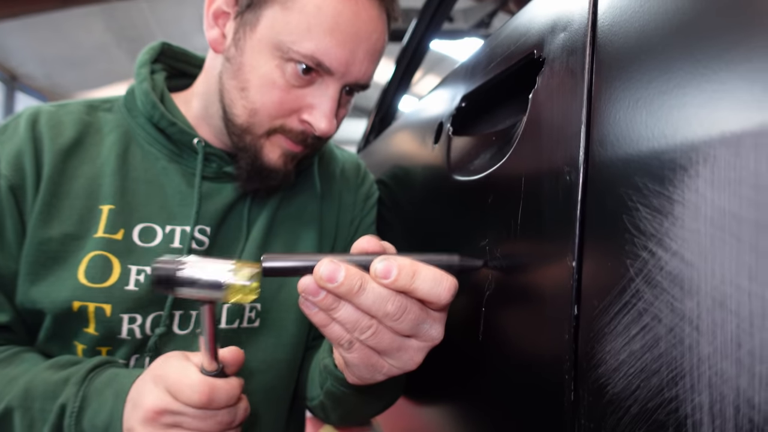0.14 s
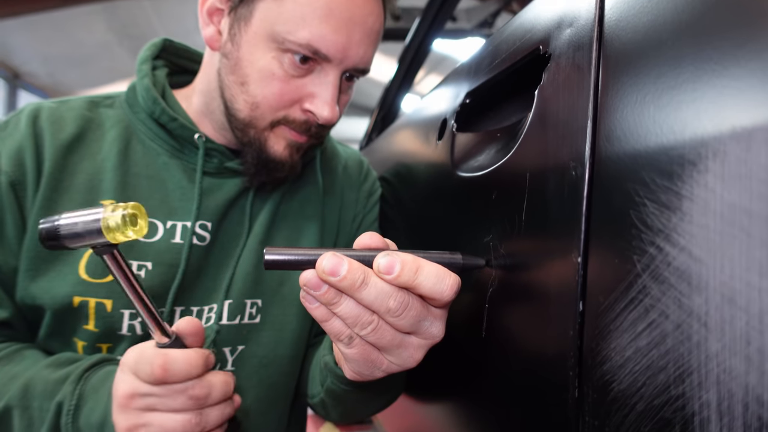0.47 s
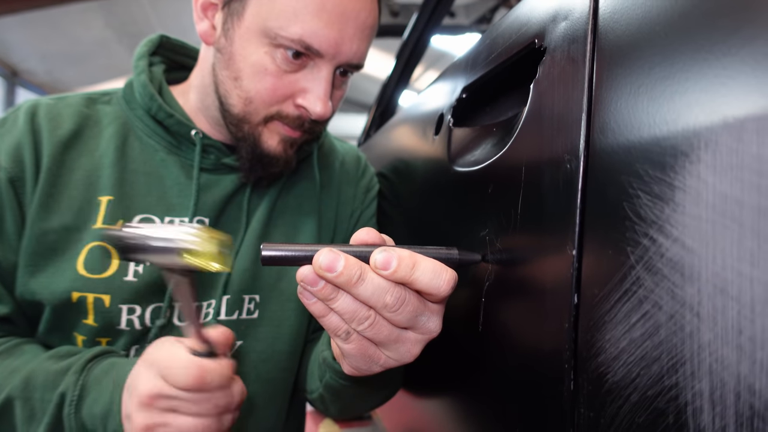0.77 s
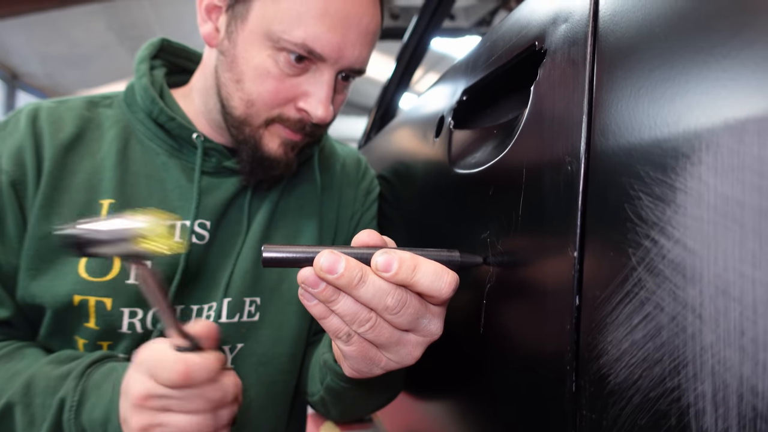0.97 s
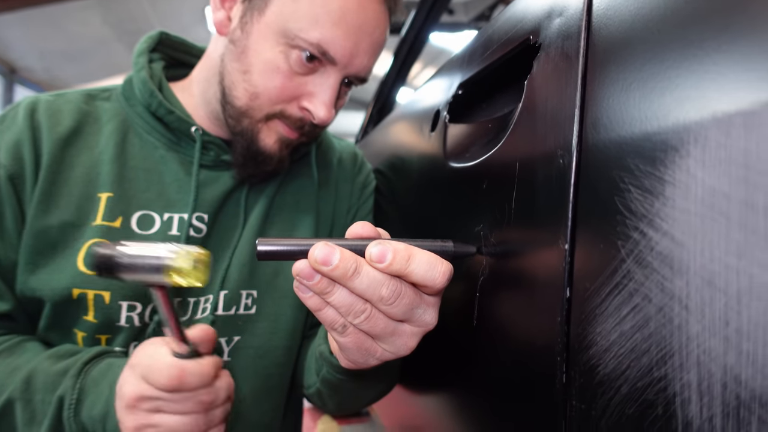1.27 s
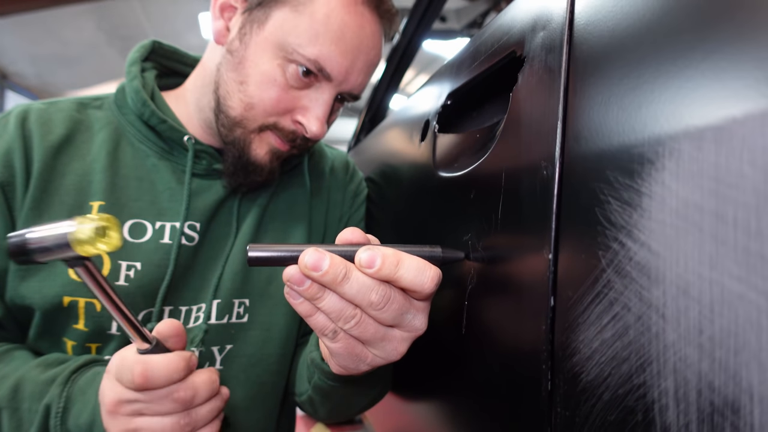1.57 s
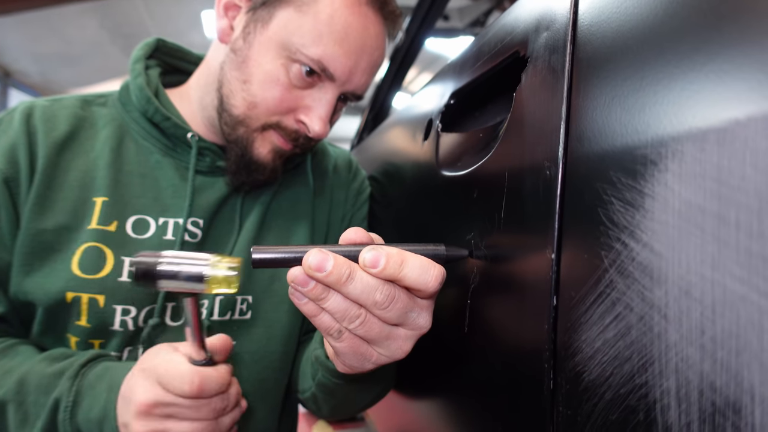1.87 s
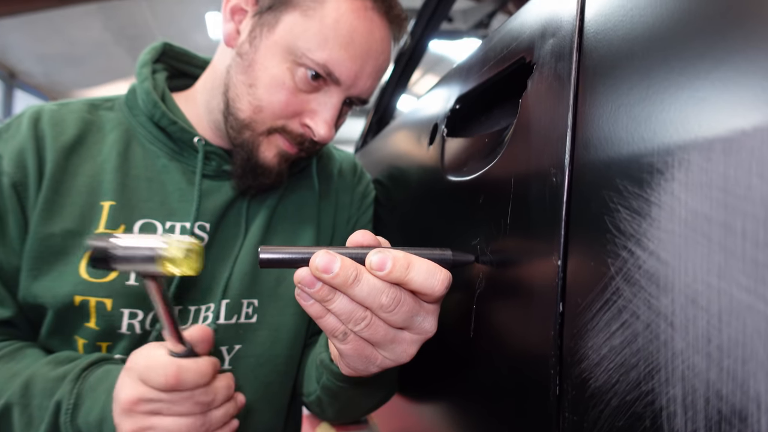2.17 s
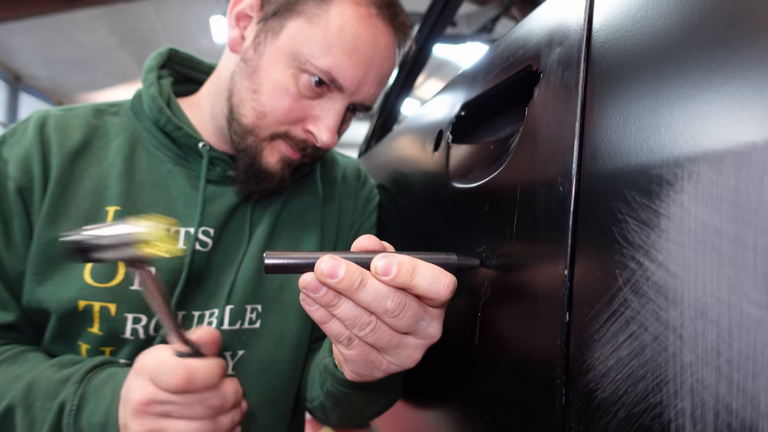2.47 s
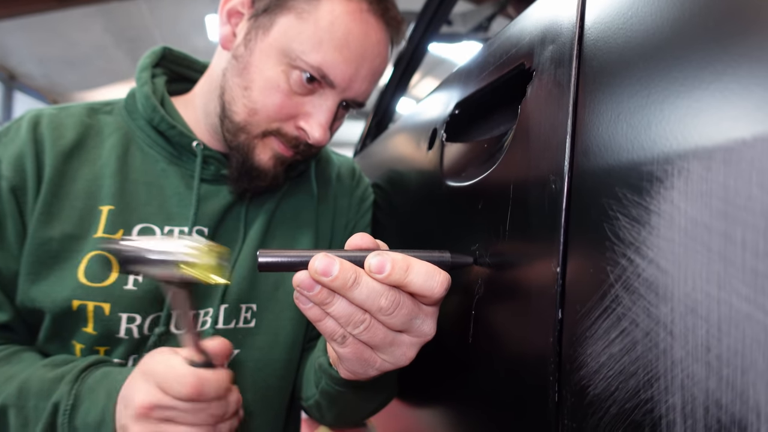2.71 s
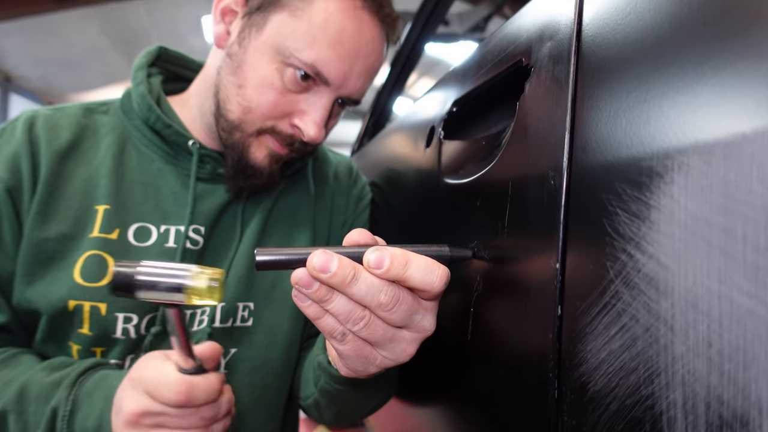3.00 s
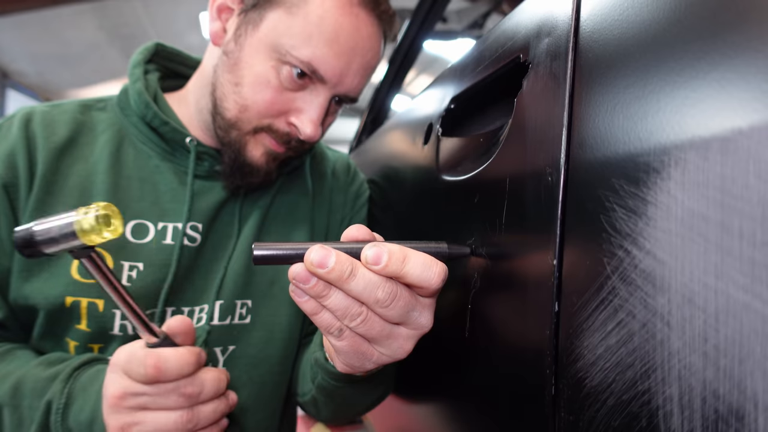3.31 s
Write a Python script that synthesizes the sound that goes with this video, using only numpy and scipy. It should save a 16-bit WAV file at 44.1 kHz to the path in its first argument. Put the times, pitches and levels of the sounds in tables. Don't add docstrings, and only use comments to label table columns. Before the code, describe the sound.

A small hammer taps a plastic punch against a car door, one tap already ringing at 0 s, then evenly about every 0.22 s from 0.18 to 3.45 s, sixteen more taps. Each is a hard, clipped snap with a hollow midrange metal ring, soft low boom and tiny rebound rattle. Tails overlap in short workshop reverberation over very faint air hiss. Close mono microphone; tone shifts slightly between blows.

```python
import sys
import numpy as np
from scipy import signal
from scipy.fft import rfft
from scipy.io import wavfile

SR = 44100
rng = np.random.default_rng(int(sys.argv[2]) if len(sys.argv) > 2 else 0)


def to_wav(sig):
    pcm = np.clip(np.atleast_2d(sig), -1, 1) * 32767
    pcm = np.round(pcm).astype(np.int16)
    wavfile.write(sys.argv[1], SR, pcm.T)


def makeup_ratio(level_db):
    decades = np.asarray(level_db, float) / 20
    return 10 ** decades


N = 152145
PAD = 4410
SPAN = 30000
DIP_S = .00016


def read(points, hz):
    f, value = np.transpose(points)
    return np.interp(np.log(hz + 1), np.log(f + 1), value)


def add(mix, start_s, sound):
    part = mix[PAD + round(start_s * SR):][:len(sound)]
    part += sound[:len(part)]


def rise(delay_s, rise_s):
    t = np.arange(SPAN) / SR
    return 1 - np.exp(-np.maximum(t - delay_s, 0) / rise_s)


def ring(modes, offsets_db=0, flip=1):
    hz, db, t60 = np.transpose(modes)[:, :, None]
    t = np.arange(SPAN) / SR
    sign = flip ** np.arange(len(modes))[:, None]
    envelope = makeup_ratio(db + offsets_db - 60 * t / t60)
    return -(sign * envelope * np.sin(2 * np.pi * hz * t)).sum(0)


def hiss(colour, t60s, size=SPAN):
    hop, window = 128, 512
    frames = size // hop + 5
    hz = np.fft.rfftfreq(window, 1 / SR)
    z = rng.standard_normal((frames, len(hz), 2)) @ [1, 1j]
    gain = makeup_ratio(read(colour, hz))
    t = np.arange(frames)[:, None] * hop / SR
    z = z * gain / np.linalg.norm(gain) * makeup_ratio(-60 * t / read(t60s, hz))
    return signal.istft(z.T, nperseg=window, noverlap=window - hop)[1][:size]


def chatter(colour, t60_s):
    size = 1024
    z = rfft(rng.standard_normal(size))
    burst = np.fft.irfft(z * makeup_ratio(read(colour, np.fft.rfftfreq(size, 1 / SR))))
    return burst * makeup_ratio(-60 * np.arange(size) / SR / t60_s)


def hump(start_s, length_s):
    u = (np.arange(SPAN) / SR - start_s) / length_s
    return np.sin(np.pi * np.clip(u, 0, 1))


def still_air():
    # frequency in Hz, shop air in dB per Hz.
    air_colour = [(20, -29), (200, -17), (470, -48), (1840, 1), (4500, -17), (8000, -35), (15500, -41),
                  (16800, -75)]
    # frequency in Hz, microphone self-noise in dB per Hz.
    self_colour = [(3000, -6), (9000, 0), (15500, -2), (16300, -30)]
    steady = [(20, 1e6), (20000, 1e6)]
    return makeup_ratio(-56) * hiss(air_colour, steady, N) + makeup_ratio(-70) * hiss(self_colour, steady, N)


def diffuse_answer():
    # frequency in Hz, dense door ring in dB per Hz.
    dense_colour = [(40, -33), (240, -11.5), (430, 1.5), (990, -11.5), (1760, -6.5), (3060, -21.5),
                    (6500, -41), (16000, -75)]
    # frequency in Hz, t60 of the dense ring in s.
    dense_t60 = [(60, 1), (260, 0.27), (700, 0.4), (1840, 0.17), (4850, 0.12), (12000, .08)]
    # frequency in Hz, workshop answer in dB per Hz.
    shop_colour = [(200, -22.5), (340, 1.5), (900, -12.5), (1850, -4.5), (5000, -29), (6000, -29),
                   (7000, -38.5), (16000, -55)]
    # frequency in Hz, t60 of the workshop in s.
    shop_t60 = [(60, 0.79), (260, 0.33), (700, 0.96), (1840, .55), (6000, 0.53), (9000, 0.56),
                (14000, 0.23)]
    dense = makeup_ratio(-12.5) * rise(0, 0.0072) * hiss(dense_colour, dense_t60)
    shop = makeup_ratio(-23) * rise(0.014, 0.0071) * hiss(shop_colour, shop_t60)
    return dense + shop


def cavity_boom():
    # frequency in Hz, level in dB, t60 in s.
    boom_modes = [(67, -30.5, .45), (114.2, -31.5, 0.29), (127, -44, 0.9), (155.9, -31, 0.41),
                  (177.2, -53.5, 0.16), (268.7, -28, 0.3)]
    rise_turns = 3.6
    return sum(rise(0, rise_turns / mode[0]) ** 2 * ring([mode]) for mode in boom_modes)


def bounce_rattle():
    # frequency in Hz, rattle in dB per Hz.
    rattle_colour = [(2500, -20), (5500, 5), (10000, -7.5), (15000, -23)]
    return chatter(rattle_colour, 0.017)


def plastic_crack(tick_db):
    # frequency in Hz, crack in dB per Hz.
    crack_colour = [(2000, -32), (4000, 26), (6500, -2), (10000, -2), (15500, 2)]
    return makeup_ratio(-15 + tick_db) * chatter(crack_colour, .007)


def panel_ring(creep, lean):
    # frequency in Hz, level in dB, t60 in s.
    shell_modes = [(343.8, -11, 0.42), (429, -8, 0.29), (466.2, -3.5, .3), (481.5, 1.5, 0.1),
                   (535, -17.5, 0.48), (563.6, -14.5, 0.47), (598, -19.5, 0.43), (629.7, -28, 0.56),
                   (677, -24, 0.44), (739.7, -16.5, 0.44)]
    # frequency in Hz, level in dB, t60 in s.
    skin_modes = [(915, -11, 0.16), (986, -13.5, 0.34), (1002, -24, 0.17), (1227, -24, 0.21),
                  (1417, -18.5, 0.45), (1478, -18.5, 0.13), (1615, -13, 0.14), (1700.5, -16.5, 0.13),
                  (1766, -16, 0.52), (1828, -10.5, 0.24), (2086, -20, 0.47), (2256, -31, 0.35),
                  (2508, -30.5, 0.62)]
    # frequency in Hz, level in dB, t60 in s.
    flex_modes = [(505, -2, .04), (920, -11, .015), (1350, -9, .008), (1900, -12, .012)]
    # frequency in Hz, level in dB, t60 in s.
    frame_modes = [(388, -9, .17), (414, -13, .17)]
    drift_db, scatter_db, frame_swap_db = 1, 1.59, 8
    offsets_db = drift_db * lean * (creep - .5) + scatter_db * rng.standard_normal(lean.shape)
    shell_db, skin_db = np.split(offsets_db, [len(shell_modes)])
    frame_db = frame_swap_db * creep * np.array([[-1], [.5]])
    rung = rise(0, 0.00077) * (ring(flex_modes) + ring(shell_modes, shell_db - 13, flip=-1))
    rung = rung + rise(0, 0.0029) * ring(skin_modes, skin_db - 14, flip=-1)
    rung = rung + rise(0, .018) ** 2 * ring(frame_modes, frame_db)
    return signal.lfilter(*signal.butter(2, 250, "high", fs=SR), rung)


def push(tick_db):
    snap_s, in_s, out_s = .00008, .00039, .00068
    snap_start, in_start, out_start = np.cumsum([DIP_S, snap_s, in_s])
    contact = -makeup_ratio(-10) * hump(0, DIP_S) + makeup_ratio(4 + tick_db) * hump(snap_start, snap_s)
    swing_in = -makeup_ratio(22) * hump(in_start, in_s)
    swing_out = makeup_ratio(13) * hump(out_start, out_s) ** 1.68
    return contact + swing_in + swing_out


def hammer_taps():
    # tick in dB, blow in dB, bounce in dB, brightness of the ring in dB.
    strengths = [(-6, 0.5, -16, -2.5), (-5, 2, -42, 0), (-11, 2.5, -30.5, -1.5), (2, 2, -39.5, 0),
                 (-7, 2, -37, -0.5), (0.5, 2, -44, 1.5), (-1.5, 0.5, -36, 1.5), (4, 2.5, -25, 1),
                 (-5, 0.5, -31, 2.5), (-10, 0.5, -39, 3), (-9, 1, -39, 1), (-14, 1, -32, -5.5),
                 (-11, 1.5, -31, 1), (-3, -2, -26, 2.5), (-9.5, 1, -24, 1), (-16, 1.5, -34, -4),
                 (-6, 1, -34, 4.5)]
    tap_times = [-.037, .1770, .3917, .6171, .8428, 1.0566, 1.2796, 1.4986, 1.7158, 1.9262, 2.1436, 2.3620,
                 2.5794, 2.8023, 3.0179, 3.2304, 3.4491]
    bounce_delays = [20, 22, 20.5, 20, 20, 20, 20, 19.5, 20, 20, 20, 18.5, 19, 20, 20, 21.5, 20]
    lead_s = .00013
    fresh = .35
    mix = np.zeros(N + PAD)
    treble = signal.butter(1, 1190, "high", fs=SR)
    boom = cavity_boom()
    early, late = diffuse_answer(), diffuse_answer()
    lean = rng.uniform(-2.5, 1, (23, 1))
    for tap_s, strength, bounce_ms in zip(tap_times, strengths, bounce_delays):
        tick_db, blow_db, bounce_db, bright_db = strength
        s = tap_s + lead_s
        creep = np.clip(s * SR / N, 0, 1) ** 2
        same = np.cos(creep) * early + np.sin(creep) * late
        diffuse = np.sqrt(1 - fresh ** 2) * same + fresh * diffuse_answer()
        door = panel_ring(creep, lean) + diffuse
        door = door + (makeup_ratio(bright_db) - 1) * signal.lfilter(*treble, door) + boom
        add(mix, s, push(tick_db) + makeup_ratio(blow_db) * door)
        add(mix, s + DIP_S, plastic_crack(tick_db))
        add(mix, s + bounce_ms / 1000, makeup_ratio(bounce_db) * bounce_rattle())
    return mix[PAD:]


def scene():
    return (hammer_taps() + still_air())[None]


def roll_off(x):
    return signal.sosfilt(signal.butter(12, 16790, fs=SR, output="sos"), x)


def record(dry):
    clip_level, knee = .65, 12
    flat = dry / (3 + abs(dry / clip_level) ** knee) ** (1 / knee)
    band_limit = signal.firwin(63, 15900, fs=SR)[None]
    return roll_off(signal.oaconvolve(flat, band_limit, "same"))


dry = scene()
out = record(dry)
to_wav(out)
```